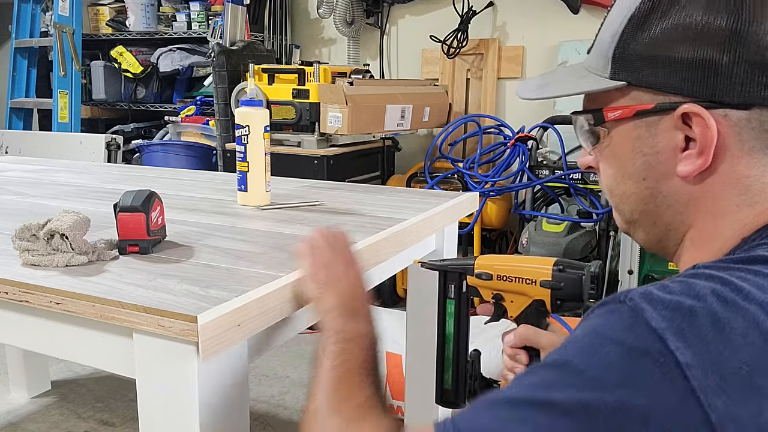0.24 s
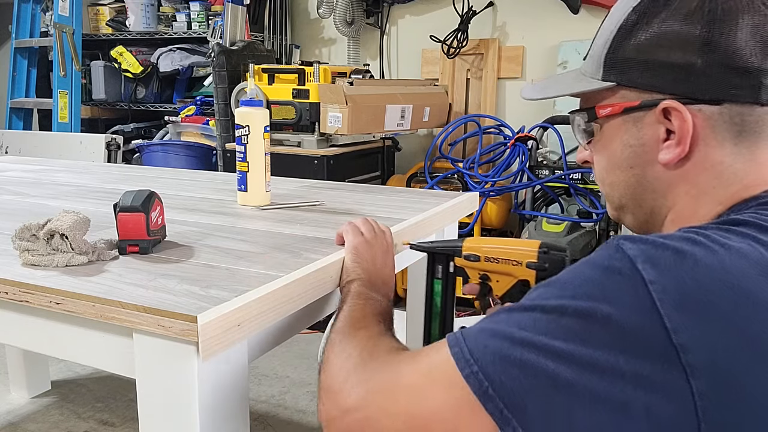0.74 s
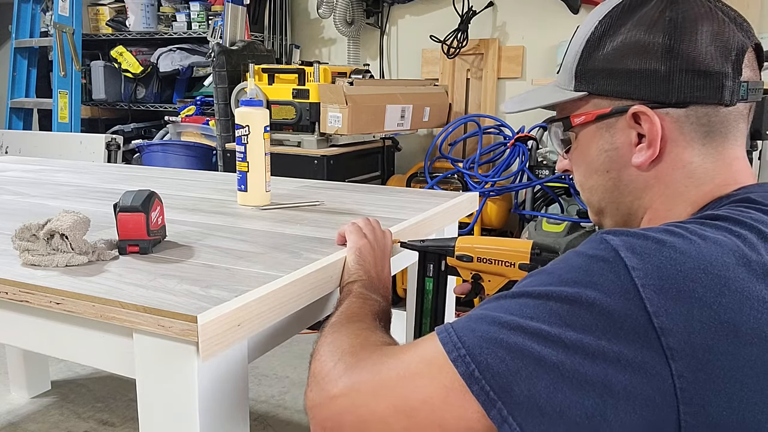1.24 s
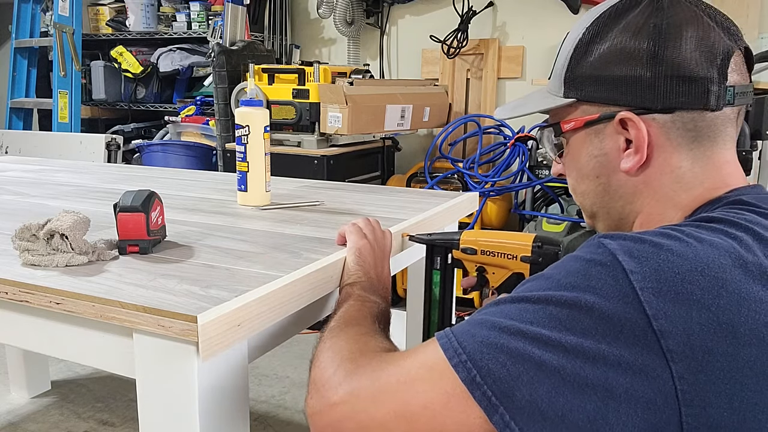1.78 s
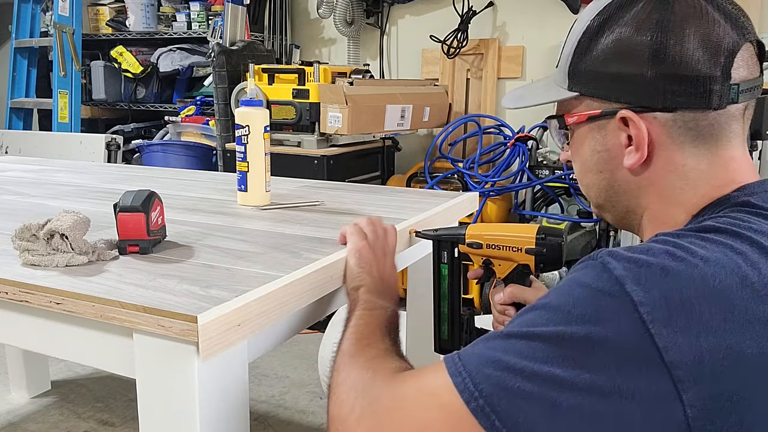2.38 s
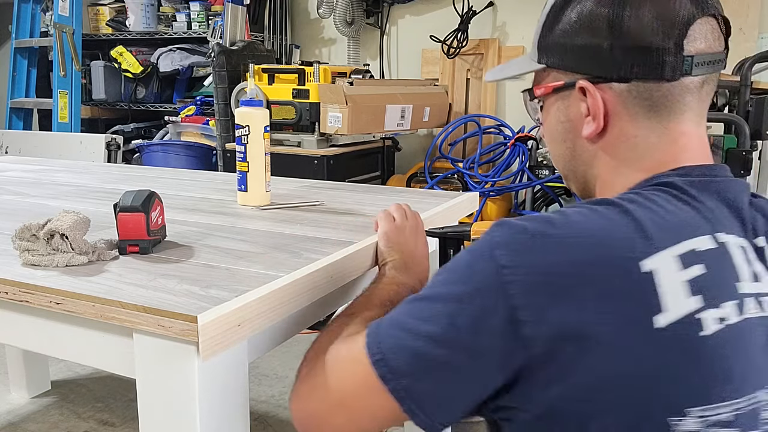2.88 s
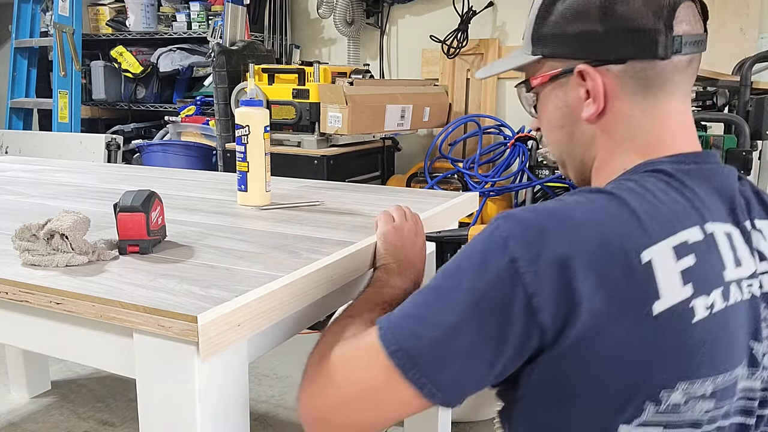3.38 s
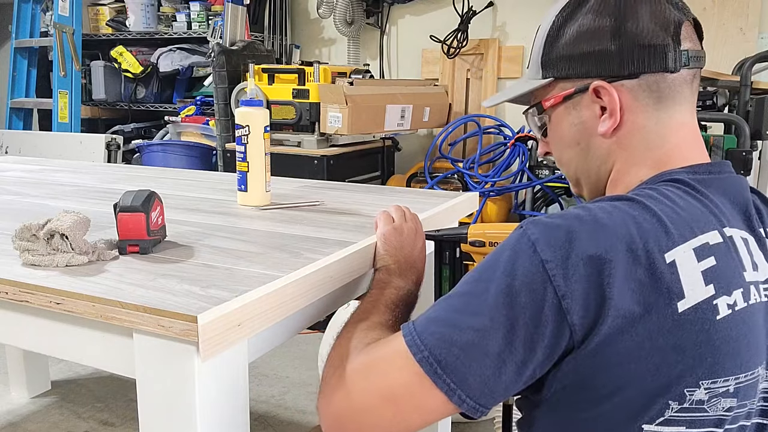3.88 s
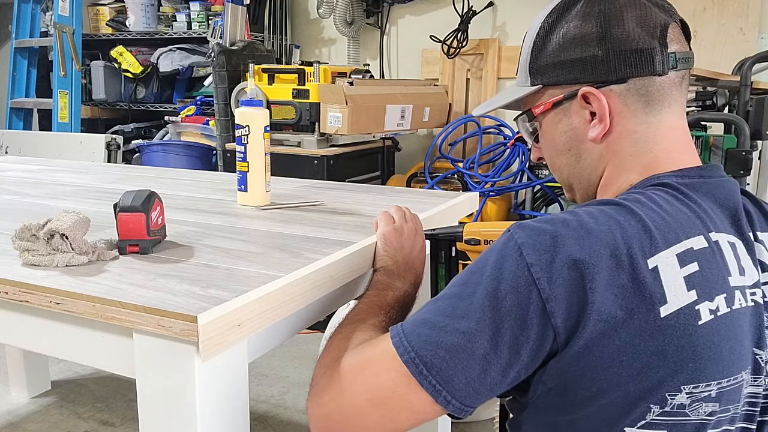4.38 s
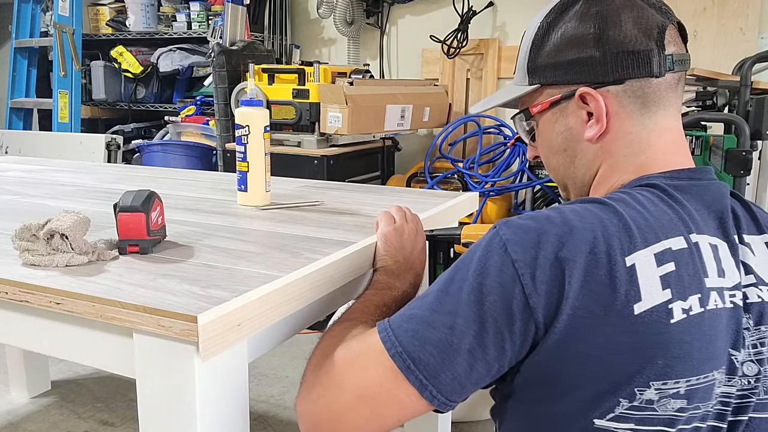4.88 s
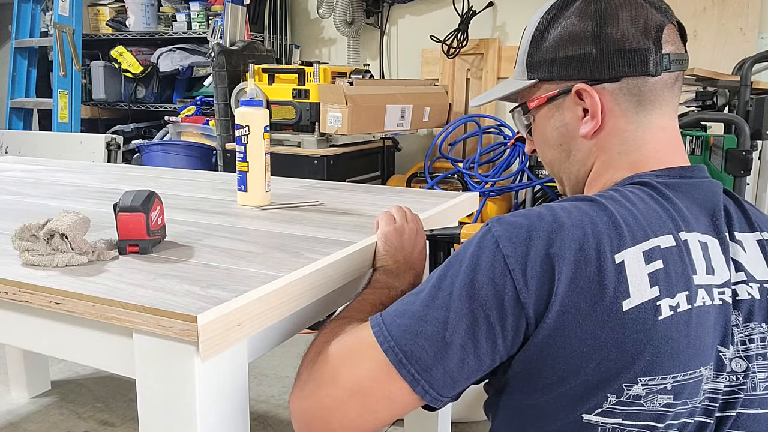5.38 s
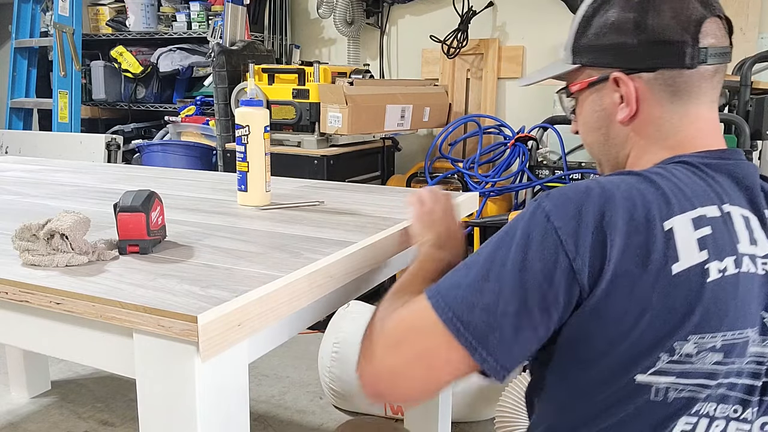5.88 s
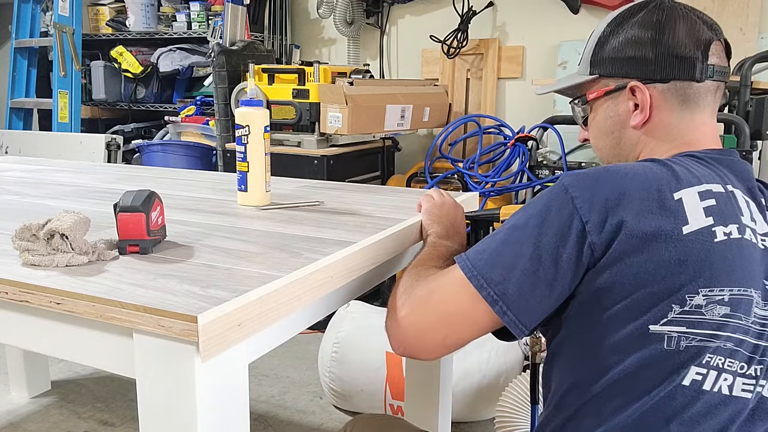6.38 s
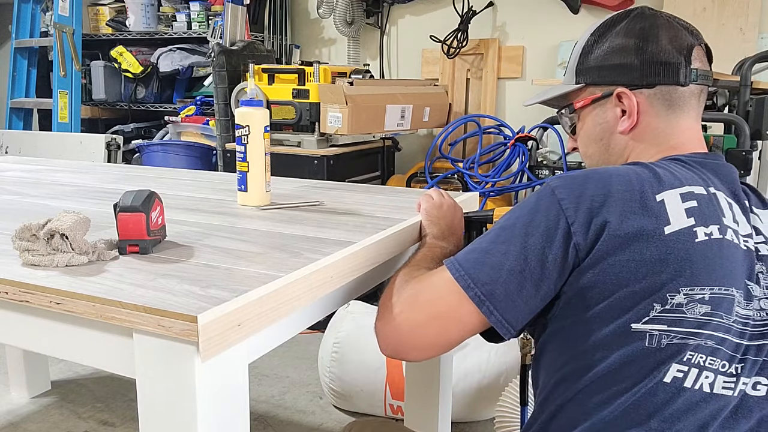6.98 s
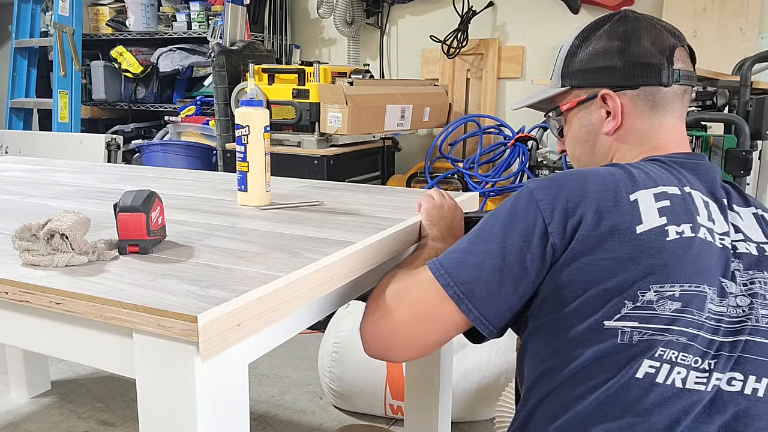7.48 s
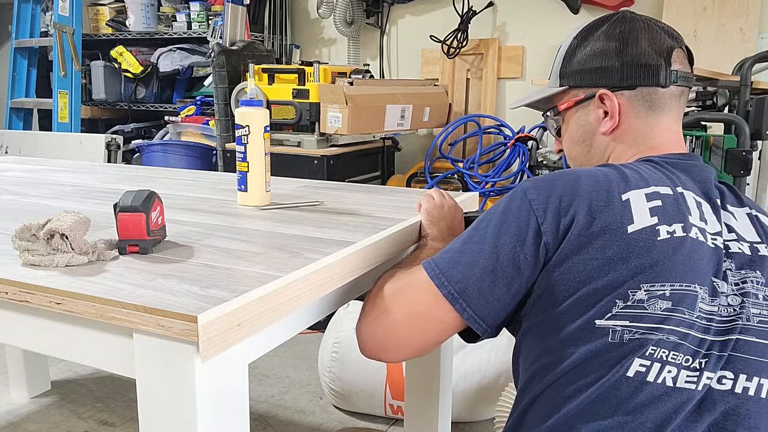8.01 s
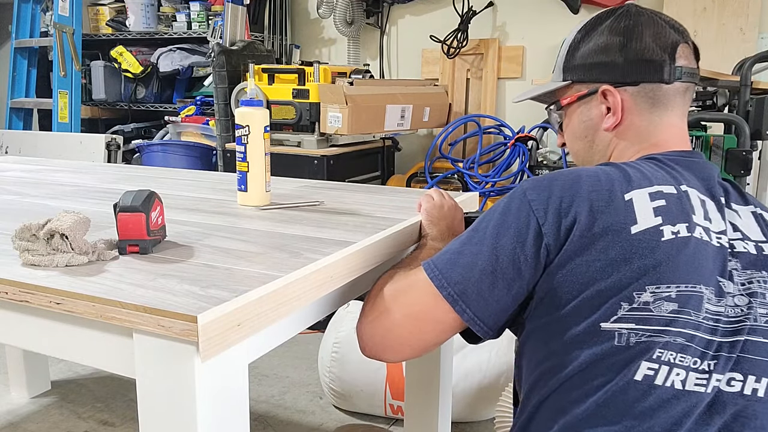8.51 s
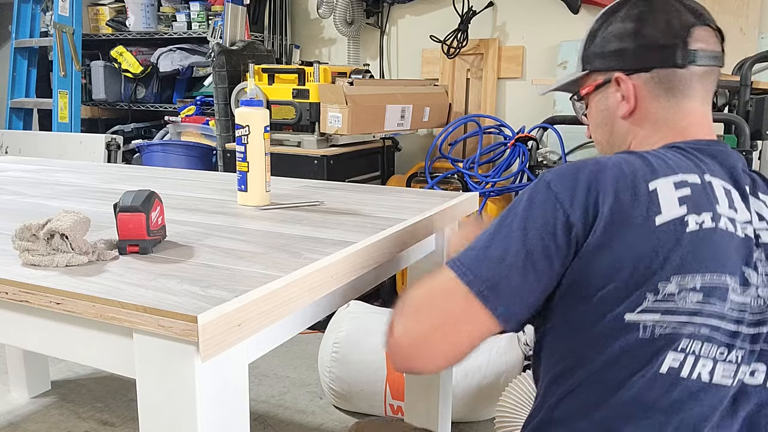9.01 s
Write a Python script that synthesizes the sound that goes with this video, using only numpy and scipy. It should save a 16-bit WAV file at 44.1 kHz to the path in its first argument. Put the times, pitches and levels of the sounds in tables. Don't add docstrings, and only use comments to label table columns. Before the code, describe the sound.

Close microphone in a garage workshop with a steady low fan hum. Light steel ticks, soft bumps and a brief grainy scrape as a pneumatic stapler is positioned on wooden trim. Midway it fires: a violent crack and wood slam, then a valve snap and air hiss. The hum dips. A few more ticks and bumps, then a second shot with a stronger exhaust burst, and soft thuds as the tool is set down.

```python
import sys
import numpy as np
from scipy import signal
from scipy.fft import rfft, irfft, next_fast_len
from scipy.io import wavfile
from scipy.ndimage import uniform_filter1d, minimum_filter1d, map_coordinates

SR = 44100
rng = np.random.default_rng(int(sys.argv[2]) if len(sys.argv) > 2 else 0)


def boost(x):
    u = np.asarray(x, float) / 20
    return 10 ** u


def store_wav(level_fs):
    pcm = np.round(np.clip(np.atleast_2d(level_fs), -1, 1) * 32767)
    wavfile.write(sys.argv[1], SR, pcm.T.astype(np.int16))


N = 407925
T = np.arange(N) / SR

# (driver blow [s], trigger release [s], first valve chatter after release [s], last click after it [s])
SHOTS = [
    (5.4411, 5.5619, .0109, .1116),
    (8.5893, 8.7288, .0087, .1187),
]
STROKE_S = [0, .0093, .0125]
# (wood [dB], air crack [dB], crack t60 [s], rattle [dB])
STROKE = [
    (-0.5, -3, 0.015, -17),
    (-15.5, -6, 0.038, -29),
    (6, -5.5, 0.031, -12),
    (-1.5, -28.5, .03, -23.5),
]
# (frequency [Hz], density [dB per Hz])
WOOD = [(29, -49), (50, -12), (135, -20), (324, -3.5), (504, -3), (740, -1.5), (993, -2), (1720, -4),
        (2030, -9.5), (2270, -11), (3040, -21.5), (3390, -15.5), (4000, -16.5), (5200, -47.5), (8800, -120)]
# (frequency [Hz], density [dB per Hz])
CRACK = [(1470, -35.5), (2500, -5), (3600, -14), (4020, -12), (4510, -9.5), (5970, -9.5), (8660, 0),
         (13800, -11.5), (16000, -43)]
# (frequency [Hz], density [dB per Hz])
PUFF = [(4500, -28.5), (7500, -9), (9000, 1.5), (12000, -1.5), (16000, -17)]
LEAK = [(5000, -19.5), (10000, -5.5), (13000, -3.0), (16000, -6.5)]
THUMP = [(150, -29.5), (300, 1), (480, -4.5), (900, -18.5), (2000, -49.5)]
# (chirp [dB], air snap [dB rms], length [s])
VALVE = [
    (7.5, -1.5, .0033),
    (-7, -12.5, .004),
    (-15, -9, .0027),
    (-35, -21, .0025),
]
# (time [s], level [dB rms], t60 [s])
SPURTS = [
    (5.566, -8, 0.35),
    (5.595, -28.5, 0.4),
    (5.607, -20.5, 0.02),
    (5.676, -26.5, .05),
    (8.7342, 7.5, .056),
    (8.752, -11, 0.38),
    (8.761, -15.5, .086),
    (8.773, -25.5, .057),
    (8.849, -27.5, .066),
]
# (frequency [Hz], density [dB per Hz])
EXHAUST = [(180, -48.5), (300, -8), (1010, -10.5), (2030, -8), (2610, -4.5), (3030, -12.5), (3400, -9.5),
           (4020, -12.5), (6000, -13), (8640, -1), (10400, -9.5), (12100, -4), (16000, -23)]
# (frequency [Hz], density [dB per Hz])
LINGER = [(1200, -25), (2600, 5), (4000, -11), (8000, -7), (14000, -20.5)]
DULL_PUFF = [(60, -17.0), (150, 6.5), (260, -4.5), (600, -26.5)]
# (time [s], peak [dB], steel [Hz])
NOSE = [
    (1.4326, -25.5, 8100),
    (3.99, -30, 7900),
    (4.0066, -22, 7880),
    (4.05, -46, 8050),
    (4.129, -40, 7900),
    (4.1455, -37, 8140),
    (6.847, -26, 7770),
    (6.8775, -34, 7850),
    (6.8887, -38, 7800),
    (6.995, -41, 9300),
]
# (time [s], peak [dB], steel [Hz], body [dB])
MAGAZINE = [(1.11, -39, 7750, -9), (1.3336, -34.5, 8690, -2), (1.35, -23.5, 8030, -6),
            (1.926, -37.5, 8650, -3.5), (2.1311, -21.5, 8700, -12.5), (2.172, -33, 8200, -2),
            (2.4473, -28, 7800, -18), (2.5803, -28, 7970, -9), (3.4276, -34, 8720, 1),
            (3.473, -24.5, 7570, -15), (3.5578, -39, 7900, -12), (3.679, -42, 7830, -7),
            (6.627, -30.5, 7700, -15)]
# (time [s], peak [dB], steel [Hz], body [dB])
SPRING = [
    (1.3893, -30, 8200, -7),
    (2.2795, -27.5, 8100, -8),
    (6.6039, -55, 8830, 10),
]
# (time [s], peak [dB], steel [Hz], body [dB])
TRIM = [
    (.972, -48, 5500, 5),
    (1.3924, -37, 6400, 7),
    (2.7752, -29, 8360, -4),
    (2.783, -27, 8030, -20),
    (8.1514, -36, 7370, 0.5),
]
# (body [Hz], broad snap [dB])
BODIES = [
    (5440, -3),
    (4540, 0),
    (3460, -0.5),
]
# (frequency [Hz], width [Hz], level [dB])
RASP = [(2500, 710, 3.5), (1480, 1100, -0.5), (3430, 600, -2), (4600, 1300, -7)]
# (frequency [Hz], density [dB per Hz])
SLIDE_HISS = [(3500, 0), (5000, 4.0), (9000, 4), (11500, 6), (15500, -17.5)]
# (time [s], push [dB], grit [dB], boom [dB])
BUMPS = [
    (.204, -32, -34, -6),
    (.972, -40, -6, -8),
    (2.7115, -20, -7.5, -5),
    (6.228, -34, -34, -8),
    (6.550, -32.5, -6, -12),
    (7.941, -26.5, -19, -13),
    (9.1152, -42, -9, -15),
    (9.1218, -35, -3.5, -22),
    (9.1227, -30, -12, -2.5),
    (9.192, -48, -25, -11),
]
# (frequency [Hz], t60 [s])
SHOP = [(100, 0.3), (500, 0.19), (2500, .5), (8000, 0.37), (15000, 0.065)]
# (frequency [Hz], level [dB rms], unsteadiness [dB])
HUM = [(75.3, -49, 3), (108, -42, 1.5), (120, -49, 1), (178, -59, 2), (276, -56, 2), (300, -53, 2),
       (1152, -66, 2)]
MAINS_HZ = [240, 359.5, 479]
# (mean level [dB rms], swing [dB], loudest at [s], beat period [s])
MAINS = [
    (-51, 5, 7.4, 19),
    (-50.5, 4.5, 1.4, 6.5),
    (-47, 3, 4.8, 5.9),
]
# (frequency [Hz], density [dB per Hz])
AIRFLOW = [(18, -46.5), (30, -23.5), (100, -2.5), (179, -16), (245, -8), (426, -11), (473, -12.5),
           (526, -12), (866, -13), (2480, -26.5), (3060, -33.5), (3580, -32.5), (7090, -39.5), (11700, -32),
           (16000, -33.5)]
# (frequency [Hz], depth [0-1])
COMB = [(300, 0.4), (1000, 1), (3000, 0.85), (7100, 0.64), (8200, .55), (10200, 0.6), (11500, 0.08),
        (12500, 0.25)]
# (frequency [Hz], amount [0-1])
NARROW = [(1000, 0.84), (3000, 0.39), (10000, 0.18)]

LEAD_S, PUFF_DB = .006, [-18.5, -22]
THUMP_DB, THUMP_T60 = [-35.5, -19], .2
RETURN_S = .0435
RATTLE_T60, RETURN_T60 = 0.35, 0.05
CHATTER_S, PING_HZ = .0106, 2660
AIRY_DB, PING_WET = [-1, 2], .1
SPURT_RISE_S, THUD_DB, THUD_FADE_DB_PER_S = .0018, -11, 281.5
EARLIER_BLOW_S, EARLIER_DB, EARLIER_T60 = -0.56, -56.5, 0.74
NOSE_SNAP_DB = -12
SLIDE_S, SLIDE_ATTACK_S, SLIDE_HOLD_S, SLIDE_RELEASE_S = 1.893, 0.22, 0.34, 0.23
HISS_DB, RASP_DB, SLIDE_FADE_DB = -47, -47, 29
PRESS_S, PRESS_WIDTH_S, PRESS_DB = 2.33, .06, 6.5
DUCK_DB, DUCK_S, HOLD_S, RECOVER_S = -10.5, .09, 1.283, 0.58
COMB_HZ, TOP_HZ = 1015, 15770


def blows():
    hits = []
    for blow, up, *_ in SHOTS:
        times = [*np.add(blow, STROKE_S), up + RETURN_S]
        for s, row in zip(times, STROKE):
            hits.append((s, *row, RETURN_T60 if s > up else RATTLE_T60))
    starts = [s for s, *_ in SHOTS]
    puff = swells([(s - LEAD_S, db, .001, .03, 0) for s, db in zip(starts, PUFF_DB)]) * noise(PUFF)
    thump = swells([(s, db, .002, THUMP_T60, 0) for s, db in zip(starts, THUMP_DB)]) * noise(THUMP)
    slam = swells([(s, wood_db, .0004, .022, 0) for s, wood_db, *_ in hits])
    rattle = swells([(s, db, .006, t60, 0) for s, *_, db, t60 in hits]) * boost(2.4 * wobble(150))
    air = swells([(s, db, .0008, t60, 0) for s, _, db, t60, *_ in hits])
    leak = swells([(s, db - 29.5, .004, .35, 0) for s, _, db, *_ in hits]) * noise(LEAK)
    wood = boost(-9.5) * (slam + rattle) * noise(WOOD)
    crack = boost(-1.5) * air * noise(CRACK)
    return thump + puff + wood + crack + leak


def release():
    ping, snaps = np.zeros(N), np.zeros(N)
    for (_, up, first, last), airy_db in zip(SHOTS, AIRY_DB):
        for delay, (chirp_db, snap_db, length) in zip([0, first, first + CHATTER_S, last], VALVE):
            t = T - (up + delay)
            gate = np.clip(t / .0004, 0, 1) * np.clip((length - t) / .001, 0, 1)
            falling_chirp = np.sin(2 * np.pi * PING_HZ * t * (1.05 - 14 * t))
            ping += boost(chirp_db - airy_db) * gate * falling_chirp
            snaps += boost(snap_db + airy_db) * gate
    thuds = []
    for s, *_ in SPURTS:
        since_release = min(abs(s - up) for _, up, *_ in SHOTS)
        thuds.append((s, THUD_DB - THUD_FADE_DB_PER_S * since_release))
    flow = swells([(s, db, SPURT_RISE_S, t60, 0) for s, db, t60 in SPURTS]) * boost(1.3 * wobble(300))
    linger = boost(EARLIER_DB - 60 * T / EARLIER_T60) * noise(LINGER)
    thud = swells([(s, db, .004, .09, 62) for s, db in thuds])
    puff = swells([(s, db - 8.0, .002, .08, 0) for s, db in thuds]) * noise(DULL_PUFF)
    return ping, (flow + snaps) * noise(EXHAUST) + linger + thud + puff


def ticks():
    out, t = np.zeros(N + SR), np.arange(1024) / SR
    f = np.fft.rfftfreq(len(t), 1 / SR)
    rows = [(*row, *body) for kind, body in zip((MAGAZINE, SPRING, TRIM), BODIES) for row in kind]
    rows += [(s, db, hz, -120, hz, NOSE_SNAP_DB) for s, db, hz in NOSE]
    decay = boost(-60 * t / 0.015) * (1 - np.exp(-t / 0.00017))
    grit = rng.standard_normal((len(rows), 3, len(t))) * decay
    peak = lambda x: x / np.abs(x).max()
    for (s, db, steel_hz, body_db, body_hz, snap_db), (a, b, c) in zip(rows, rfft(grit)):
        steel = peak(irfft(a * modes([(steel_hz, 1400, 0)])(f) ** 3))
        body = peak(irfft(b * modes([(body_hz, 900, 0)])(f) ** 2))
        snap = peak(irfft(c * modes([(3000, 7000, 0)])(f) / (1 + (f / 11000) ** 4)))
        touch = steel + boost(body_db) * body + boost(snap_db) * snap
        out[round(s * SR):][:len(t)] += boost(db) * touch
    return out[:N]


def slide():
    s = SLIDE_S + np.cumsum([0, SLIDE_ATTACK_S, SLIDE_HOLD_S, SLIDE_RELEASE_S])
    stroke_db = np.interp(T, s, [-SLIDE_FADE_DB, 0, 0, -SLIDE_FADE_DB], -120, -120)
    press_db = PRESS_DB * np.exp(-((T - PRESS_S) / PRESS_WIDTH_S) ** 2)
    grain = boost(0.89 * wobble(250))
    hiss = boost(HISS_DB + stroke_db) * noise(SLIDE_HISS)
    resonant = unit(filtered(rng.standard_normal(N), modes(RASP)))
    rasp = boost(RASP_DB + stroke_db + press_db) * resonant
    return (hiss + rasp) * grain / np.sqrt(np.mean(grain ** 2))


def bumps():
    out, t = np.zeros(N + SR), np.arange(4096) / SR
    push = np.sin(np.pi * np.clip(t / 0.0011, 0, .999)) ** .5
    rebound = -.35 * np.sin(np.pi * np.clip((t - .0012) / 0.005, 0, 1))
    knock = 0.89 * np.sin(2 * np.pi * 310 * t) + .5 * np.sin(2 * np.pi * 720 * t)
    table = np.sin(-2 * np.pi * 55 * t) + knock * (t > .003)
    grits = rng.standard_normal((len(BUMPS), len(t)))
    for (s, db, grit_db, boom_db), grit in zip(BUMPS, grits):
        boom = boost(boom_db - 60 * t / 0.045) * table
        gritty_push = push * (1 + boost(grit_db) * (grit - 0.17 * np.roll(grit, 1)))
        scrape = boost(grit_db - 10 - 60 * t / 0.009) * np.diff(grit, n=2, prepend=[0, 0])
        out[round(s * SR):][:len(t)] += boost(db) * (gritty_push + rebound + boom + scrape)
    return out[:N]


def shop(x):
    hz, t, z = signal.stft(rng.standard_normal(SR // 2), SR, nperseg=256)
    decay = boost(-60 * t / along(SHOP, hz)[:, None])
    tail = signal.istft(z * decay, SR, nperseg=256)[1]
    return signal.fftconvolve(np.pad(x, (500, 0)), tail / np.linalg.norm(tail))[:N]


def fan():
    tones, mains = np.zeros(N), np.zeros(N)
    for hz, db, rough_db in HUM:
        tones += boost(db + 3.5 + rough_db * wobble(10)) * np.sin(2 * np.pi * hz * T + .5 * wobble(2.7))
    for hz, (db, swing_db, s, period) in zip(MAINS_HZ, MAINS):
        beat_db = swing_db * np.cos(2 * np.pi * (T - s) / period)
        mains += boost(db + 2.0 + beat_db) * np.sin(2 * np.pi * hz * T + 0.22 * wobble(3.4))
    flow = boost(-39.5 + 0.74 * wobble(7.7)) * noise(AIRFLOW)
    whine_hz = 12022 - 72 * np.cos(2 * np.pi * (T - 4.33) / 3.33)
    whine = boost(-63) * np.sin(2 * np.pi * np.cumsum(whine_hz) / SR)
    return gain_control() * (tones + mains + flow + whine)


def gain_control():
    since = T - np.array([[EARLIER_BLOW_S], *[[s] for s, *_ in SHOTS]])
    fall = 1 - np.exp(-np.clip(since, 0, None) / DUCK_S)
    recovery = np.exp(-(np.clip(since - HOLD_S, 0, None) / RECOVER_S) ** 1.34)
    return boost(DUCK_DB * (fall * recovery).max(axis=0))


def unit(x):
    return x / np.sqrt(np.mean(x ** 2) + 1e-20)


def along(points, hz):
    f, v = np.transpose(points)
    return np.interp(np.log(hz + 1), np.log(f + 1), v)


def wobble(rate):
    return map_coordinates(rng.standard_normal(int(N * rate / SR) + 4), [T * rate])


def filtered(x, response):
    m = next_fast_len(N + SR // 2)
    return irfft(rfft(x, m) * response(np.fft.rfftfreq(m, 1 / SR)), m)[..., :N]


def noise(spectrum):
    return unit(filtered(rng.standard_normal(N), lambda hz: boost(along(spectrum, hz))))


def modes(peaks):
    def response(f):
        total = 0
        for k, (c, w, db) in enumerate(peaks):
            total = total + (-1) ** k * boost(db) * 1j * f * w / (c * c - f * f + 1j * f * w)
        return total
    return response


def swells(rows):
    out, t = np.zeros(N + SR), np.arange(SR // 2) / SR
    for s, db, rise, t60, hz in rows:
        envelope = boost(db - 60 * t / t60) * (1 - np.exp(-t / rise))
        out[round(s * SR):][:len(t)] += envelope * np.cos(2 * np.pi * hz * t)
    return out[:N]


def scene():
    hit, (ping, vent), touch = blows(), release(), ticks()
    wet = boost(-6.5) * hit + boost(-16.5) * vent + PING_WET * ping
    late = T > 7
    room = shop(wet * late) + shop(wet * ~late) + boost(-20.5) * shop(touch)
    return (hit + ping + vent + touch + room + bumps() + slide() + fan())[None]


def low_pass(x):
    return signal.sosfilt(signal.butter(12, 17000, fs=SR, output="sos"), x)


def record(dry):
    loop = lambda hz: np.clip(along(COMB, hz), 0, .98) * np.exp(-2j * np.pi * hz / COMB_HZ)
    feedback = lambda hz: np.clip(along(NARROW, hz), 0, .95) * loop(hz)
    x = filtered(dry, lambda hz: (1 - loop(hz)) / (1 - feedback(hz)))
    power = filtered(x, lambda hz: hz > 13000) ** 2
    average = np.roll(uniform_filter1d(power, size=1025), 700)
    attack = uniform_filter1d(power, size=129) > 20 * average
    opened = np.clip(100 * uniform_filter1d(1. * attack, size=501), 0, 1)
    need = np.minimum(1, 1.04 / (np.abs(x) + 1e-9))
    x = x * uniform_filter1d(minimum_filter1d(need, size=601), size=301)
    low = filtered(x, lambda hz: hz < TOP_HZ)
    top = filtered(x - low, lambda hz: boost(-13.0 - np.abs(hz - TOP_HZ) / 70))
    return low_pass(low + uniform_filter1d(opened, size=201) * top)


dry = scene()
out = record(dry)
store_wav(out)
```